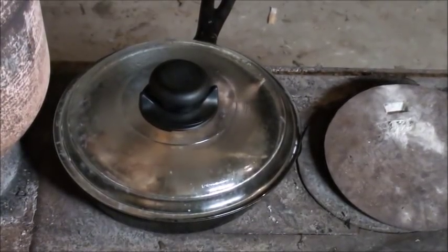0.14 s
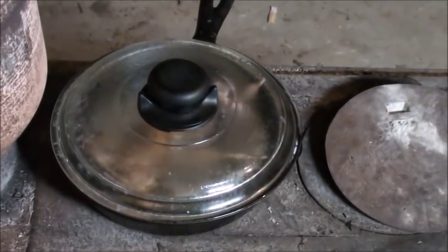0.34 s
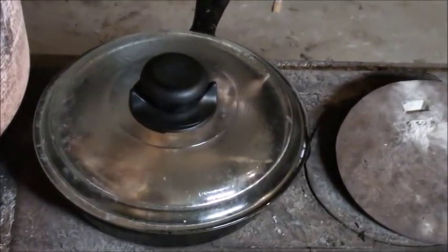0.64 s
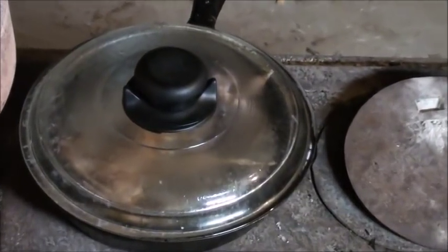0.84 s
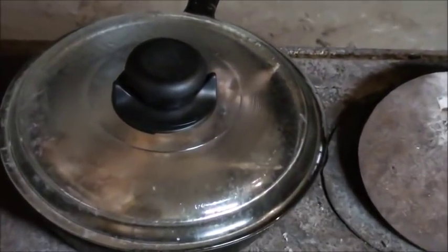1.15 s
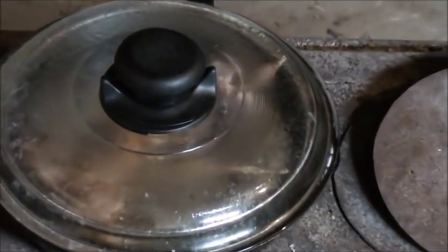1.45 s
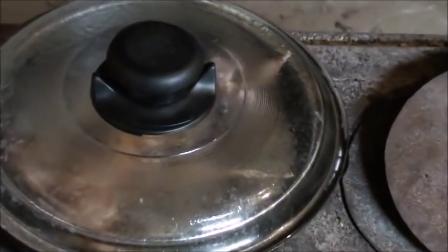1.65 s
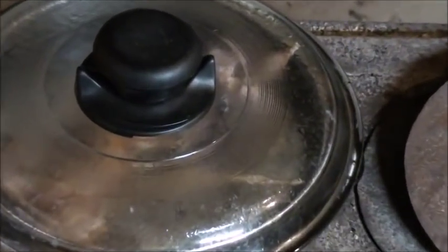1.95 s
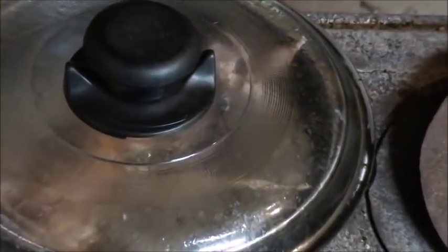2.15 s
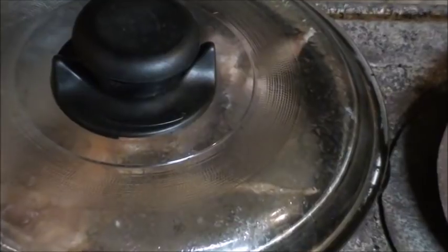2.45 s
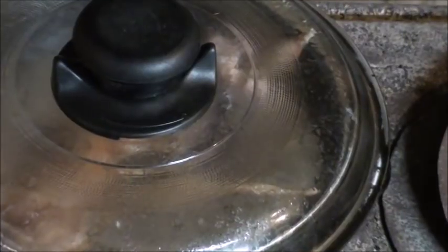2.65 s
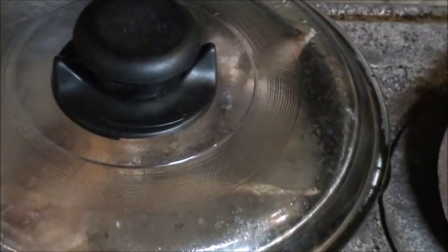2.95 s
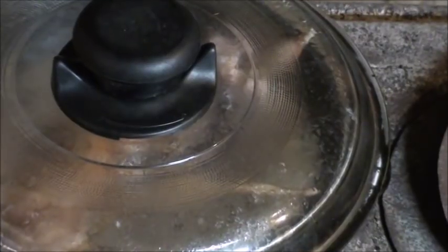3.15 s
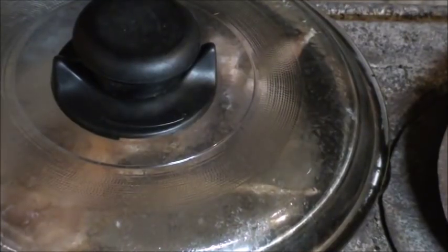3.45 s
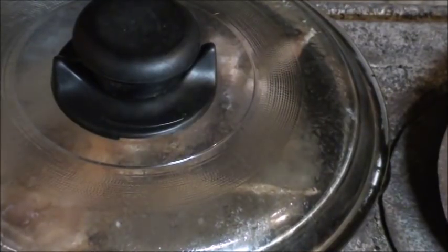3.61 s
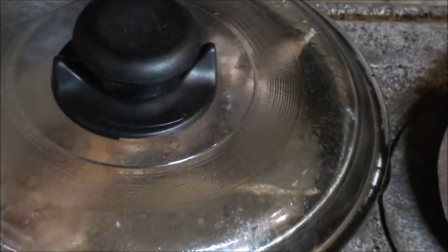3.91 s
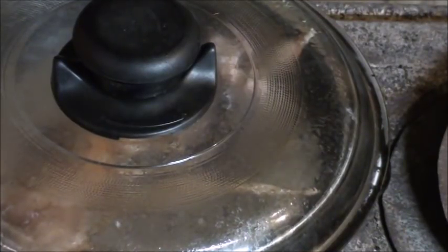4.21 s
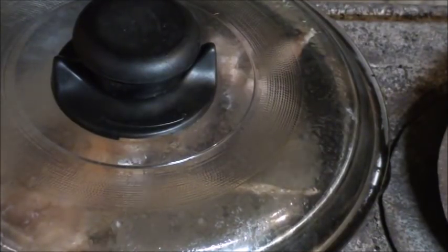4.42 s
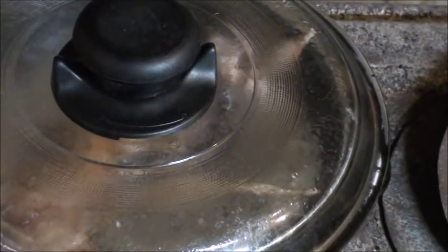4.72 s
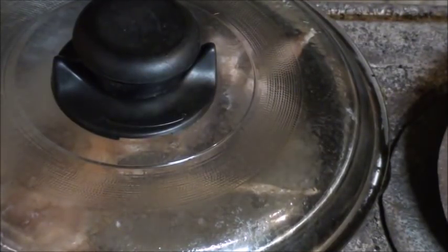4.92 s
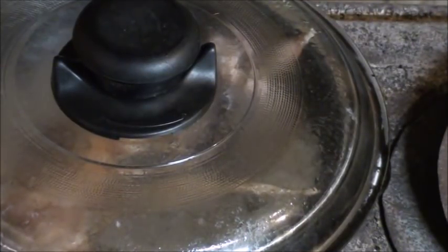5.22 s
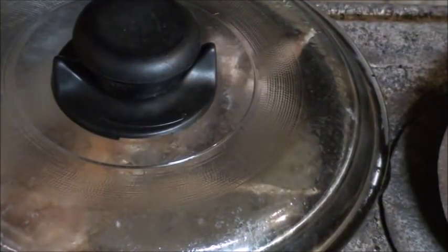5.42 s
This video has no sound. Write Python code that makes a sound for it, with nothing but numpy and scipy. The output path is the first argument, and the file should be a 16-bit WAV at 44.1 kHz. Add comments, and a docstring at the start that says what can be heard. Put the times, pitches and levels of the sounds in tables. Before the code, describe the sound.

Meat sizzles hard in hot grease under a lid, close up, with sharp spits, a hollow bubbling ring and a few low plops.

```python
"""Meat fries in hot grease under a skillet lid, close by, over a soft kitchen rumble and hum (filtered noise).
It opens on a surge of low simmer (bursts ringing the pan), early plops (gliding sines) and a flare of fine fizz.
The sizzle (thousands of tiny damped sines a second, impulses and noise) sags while sharp noise spits cluster.
Near three seconds it fries hard again and the air under the lid, rung by random bursts, boils up loudest.
Low plops follow at four seconds, then the frying eases, with one more flare and a last spit near the end."""
import sys
import numpy as np
from scipy import signal
from scipy.fft import rfft, irfft, next_fast_len
from scipy.io import wavfile
from scipy.ndimage import uniform_filter1d, map_coordinates

SR = 44100
rng = np.random.default_rng(int(sys.argv[2]) if len(sys.argv) > 2 else 0)


def unload_audio(sound):
    """Save the sound as a 16-bit wav file, at the path given as the first command line argument."""
    columns = np.transpose(np.atleast_2d(sound))
    # keep every value between -1 and 1, then stretch to whole-number steps
    steps = np.round(np.clip(columns, -1, 1) * 32767)
    wavfile.write(sys.argv[1], SR, steps.astype(np.int16))


N = 245637  # length in samples

# kitchen rumble, relative spectrum: freq_hz, density_db_per_hz
ROOM_SPECTRUM = [(15, -24), (35, -10), (80, -8), (120, -1.5), (180, -2), (400, 0), (650, -11.5),
                 (1200, -3.5), (3000, -30.5)]
# kitchen hum: freq_hz, width_hz, relative_level_db
HUM_MODES = [(60, 5.4, -18), (96.8, 14, -8.5)]
# low resonances of the covered pan: freq_hz, width_hz, relative_level_db
PAN_MODES = [(201.5, 37, -9), (301.6, 26.5, 1), (379, 47, -7), (408.9, 6, 2), (476.5, 25, -7),
             (700, 88, -15), (889, 42, -13)]
# single fat bubbles: start_s, starting_pitch_hz, level_db, t60_s
FAT_BUBBLES = [(.02, 300, -28, 0.2), (0.186, 300, -20.5, 0.12), (.25, 890, -33, 0.14),
               (.565, 904, -33.5, 0.13), (1.094, 289.4, -30.5, 0.25), (2.368, 2400, -20.5, 0.082),
               (2.577, 970, -23.5, 0.049), (2.58, 1110, -26.5, 0.045), (4.023, 250, -22, 0.043),
               (4.023, 450, -25, .035), (4.024, 620, -31.5, 0.041)]
# modes of the lid's shell: freq_hz, width_hz, relative_level_db
SHELL_MODES = [(2963, 95, -6.5), (3117, 56, -1.5), (3225, 25, 4.5), (3348, 19, 1.5), (3419, 23, 2.5),
               (4020, 130, -10), (4480, 53, -2.5), (4917, 67, 2), (5290, 49, 0.5), (7300, 40, 3)]
# how hard the juices boil, heard as the ring under the lid, before trim: time_s, level_db
BOIL_CURVE = [(0, -34.5), (.7, -37.5), (1.25, -40), (2, -36.5), (2.35, -34), (3.3, -33), (4.1, -37),
              (5.57, -39)]
# main resonance of the air under the lid: freq_hz, width_hz, relative_level_db
CAVITY_MODE = [(1368.3, 21.3, 0)]
# higher resonances of the air under the lid: freq_hz, width_hz, relative_level_db
LID_AIR_MODES = [(1436, 32, -3.5), (1558, 54, -1), (2268, 8.1, -4), (2316, 22, -8), (2415, 28, -4.5)]
# gushes of steam that swell the main resonance, before trim: start_s, length_s, level_db
STEAM_GUSHES = [(0.083, 0.079, -30.5), (0.279, 0.046, -31), (0.44, 0.054, -33), (0.545, 0.057, -33.5),
                (0.681, 0.031, -32), (0.792, 0.032, -33.5), (0.997, 0.027, -32), (1.521, 0.026, -33.5),
                (1.578, 0.02, -32.5), (1.666, 0.044, -34), (2.322, 0.089, -31), (2.648, 0.038, -33.5),
                (2.82, 0.045, -30.5), (2.902, 0.045, -30.5), (3.023, 0.12, -35), (3.153, 0.035, -31.5),
                (3.425, 0.022, -32), (3.586, 0.054, -34), (3.749, 0.029, -33.5), (3.815, 0.048, -32),
                (3.937, 0.11, -35), (4.311, 0.024, -31), (4.99, 0.035, -34), (5.408, 0.069, -34)]
# bright resonance at the rim: freq_hz, width_hz, relative_level_db
RIM_MODE = [(4204, 90, 0)]
# how hard the grease fries, before flares and trim: time_s, level_db
FRY_CURVE = [(0, -17), (.38, -18.5), (.6, -20), (.85, -19), (1.25, -20.5), (1.95, -18), (2.4, -19.5),
             (2.95, -17), (3.8, -18.5), (4.6, -20), (5.1, -21.6), (5.57, -21)]
# bursts as they leave by the rim of the lid, relative spectrum: freq_hz, density_db_per_hz
SIZZLE_SPECTRUM = [(500, -29.5), (2000, -22), (2700, -17), (3650, -11), (4050, -4), (4600, -7),
                   (5500, -5.5), (6100, -2), (7200, -0.5), (8400, -8), (9400, -4), (10800, -11),
                   (12200, -19), (15500, -33)]
# sharpest spits of grease: start_s, level_db (above the sizzle source at rms 1)
SPIT_HITS = [(.483, 16), (0.892, 11), (0.95, 7), (.972, 5), (1.122, 1), (1.295, 10), (1.334, 10),
             (1.465, 12), (1.72, 5), (2.353, 7), (4.703, 7), (5.464, 10)]
# juice runs into the grease and the finest fizz flares up: peak_s, length_s, fine_fizz_boost_db
JUICE_FLARES = [(.17, 0.64, 3.8), (1.565, 0.34, 4.4), (2.766, 0.49, 3), (5.202, 0.38, 2.2)]
# gain of the stereo side part: freq_hz, gain_db
SIDE_GAIN = [(60, -45), (170, -15), (330, -16), (650, -4), (1000, -4.5), (1400, -17.5), (3000, -13.5),
             (4200, -36), (5500, -16), (9000, -15), (11000, -100)]

GUSH_ATTACK_S, GUSH_RELEASE_S = 0.0088, .025  # time constants before and after each gush
FINE_DB, DRYING_DB_PER_S = 0, 0.41  # finest fizz at the start, and how it thins as the meat dries
FLARE_SHARE = 0.26  # part of a flare's boost, in dB, that the whole sizzle gains too
LEAN_DB = .7  # first channel over the second
TOP_HZ = 15750  # nothing sounds from here up


def amp(db):
    """Decibels to gain."""
    return 10 ** (np.asarray(db) / 20)


def unit(x):
    """Scale to rms 1."""
    return x / np.sqrt(np.mean(x ** 2) + 1e-20)


def evened(x, size):
    """Hold x near rms 1 over every 2 * size samples."""
    power = uniform_filter1d(uniform_filter1d(x * x, size), size)
    return x / np.sqrt(np.abs(power) + 1e-20)


def along(points, hz):
    """Read (freq_hz, value) points on a log frequency axis."""
    freq_hz, value = np.transpose(points)
    return np.interp(np.log(hz + 1), np.log(freq_hz + 1), value)


def seconds():
    """Time of every sample in seconds."""
    return np.arange(N) / SR


def level_curve(rows):
    """Draw (time_s, level_db) points as one level per sample."""
    time_s, level_db = np.transpose(rows)
    return np.interp(seconds(), time_s, level_db)


def wobble(rate):
    """A smooth random curve with rate knots a second."""
    knots = rng.standard_normal(int(N * rate / SR) + 4)
    return map_coordinates(knots, [np.arange(N) * rate / SR])


def hump(centre, length):
    """A smooth rise from 0 to 1 and back."""
    return np.cos(np.pi * np.clip((seconds() - centre) / length, -.5, .5)) ** 2


def filtered(x, response):
    """Multiply the spectrum of x by a response of frequency."""
    padded = next_fast_len(N + SR // 2)
    spectrum = rfft(x, padded) * response(np.fft.rfftfreq(padded, 1 / SR))
    return irfft(spectrum, padded)[..., :N]


def above(x, edge_hz, order):
    """High-pass without phase shift."""
    return filtered(x, lambda hz: 1 / (1 + (edge_hz / (hz + 1)) ** order))


def coloured(x, spectrum, size=2048):
    """Give x the spectrum through a causal minimum-phase filter, so that clicks keep their sharp front."""
    cepstrum = irfft(np.log(amp(along(spectrum, np.fft.rfftfreq(size, 1 / SR)))))
    # folding the cepstrum forward makes the filter minimum-phase
    cepstrum[1:size // 2] *= 2
    cepstrum[size // 2 + 1:] = 0
    impulse = irfft(np.exp(rfft(cepstrum)))
    return signal.fftconvolve(x, impulse)[:N]


def resonate(x, modes):
    """Ring x through (freq_hz, width_hz, level_db) resonances of alternating sign."""
    def response(hz):
        total = 0
        for k, (centre, width, db) in enumerate(modes):
            damping = 1j * hz * width
            total = total + (-1) ** k * amp(db) * damping / (centre * centre - hz * hz + damping)
        return total
    return filtered(x, response)


def random_sizes_db(spread_db, shape):
    """Bell-shaped spread of sizes in dB, cut at 2.5 deviations."""
    return spread_db * np.clip(rng.standard_normal(shape), -2.5, 2.5)


def bursts(rate, spread_db):
    """Impulses at random moments, rate a second, of log-normal size and either sign."""
    when, sign = rng.random((int(rate * N / SR), 2)).T
    sizes = amp(random_sizes_db(spread_db, len(when))) * np.sign(sign - .5)
    return unit(np.bincount((when * N).astype(int), sizes, N))


def bubbles(rate, spread_db, cycles, low_hz, high_hz, size=160):
    """Tiny bubbles, each a damped sine of its own pitch whose decay constant is a number of cycles."""
    when, pitch = rng.random((int(rate * N / SR), 2)).T[:, :, None]
    size_db = random_sizes_db(spread_db, when.shape)
    hz = low_hz + (high_hz - low_hz) * pitch
    turns = hz * np.arange(size) / SR
    grains = amp(size_db) * np.sqrt(hz) * np.sin(2 * np.pi * turns) * np.exp(-turns / cycles)
    at = (when * N).astype(int) + np.arange(size)
    return unit(np.bincount(at.ravel(), grains.ravel())[:N])


def boil():
    """Decibels by which the boiling lies above its average."""
    level_db = level_curve(BOIL_CURVE)
    return level_db - level_db.mean()


def kitchen():
    """Soft room rumble with a wavering low hum, both filtered noise."""
    rumble = unit(coloured(rng.standard_normal(N), ROOM_SPECTRUM, size=8192))
    hum = evened(resonate(rng.standard_normal(N), HUM_MODES), size=8000)
    return amp(-43.5) * rumble + amp(-54.5) * hum


def simmer(level_db=-41.0, follows=0.4, surge_db=8.0, surge_s=0.57, drying_db_per_s=0.27):
    """Juices bubble under the meat and sound the low pan resonances; an opening surge settles to the boil."""
    t = seconds()
    settling = np.maximum(1 - t / surge_s, 0)
    swell_db = follows * boil() + surge_db * settling - drying_db_per_s * t
    strength = amp(level_db + swell_db + 1.1 * wobble(8.8))
    return strength * evened(resonate(bursts(rate=700, spread_db=2.5), PAN_MODES), size=4000)


def plops(rise=.12, attack_s=0.0013, rough=0.46, rough_at_hz=900):
    """Fat bubbles ring briefly, pitch rising and wavering as they surface; small ones waver most."""
    out = np.zeros(N)
    for start_s, hz, db, t60 in FAT_BUBBLES:
        t = np.maximum(seconds() - start_s, 0)
        glide = 2 * np.pi * hz * t * (1 + rise * t / t60)
        waver = rough * hz / rough_at_hz * wobble(400)
        envelope = amp(db - 60 * t / t60) * (1 - np.exp(-t / attack_s))
        out += envelope * np.sin(glide + waver)
    return out


def shell(start_db=-33.5, follows=0.56, wetting_db_per_s=0.74):
    """Droplets pepper the lid's underside and faintly ring its modes, more as it boils and gets wet."""
    level_db = start_db + follows * boil() + wetting_db_per_s * seconds()
    return amp(level_db) * unit(resonate(bursts(rate=600, spread_db=3.5), SHELL_MODES))


def gushes():
    """Strength of the steam gushes: each rises, holds and dies away; the strongest wins."""
    t = seconds()
    strengths = []
    for start_s, length_s, db in STEAM_GUSHES:
        before = np.maximum(start_s - t, 0) / GUSH_ATTACK_S
        after = np.maximum(t - start_s - length_s, 0) / GUSH_RELEASE_S
        strengths.append(amp(db) * np.exp(-(before + after)))
    return np.max(strengths, axis=0)


def lid_drive(spatter):
    """Shared spatter plus a fresh layer of dense small bursts strikes the air under the lid."""
    return amp(-4.0) * spatter + bursts(rate=2500, spread_db=2.5)


def lid(spatter, gush_db=1.5, rest_db=-38, follows=0.23, waver_db=3.0, ring_db=-0.6, dulling=0.28):
    """Bursts keep the air under the lid ringing; it swells with gushes and wavers between them."""
    between = amp(rest_db + follows * boil() + waver_db * wobble(16))
    strength = np.maximum(between, amp(gush_db) * gushes())
    cavity = strength * evened(resonate(lid_drive(spatter), CAVITY_MODE), size=2000)
    ring_level = amp(level_curve(BOIL_CURVE) + ring_db + 1.3 * wobble(9))
    ring = ring_level * unit(resonate(lid_drive(spatter), LID_AIR_MODES))
    # a harder boil makes bigger bubbles, which favour the lower resonances
    ring = ring + above(ring, 1900, order=16) * (amp(-dulling * boil()) - 1)
    # the lid radiates little below its first resonance
    return above(cavity + ring, 1030, order=10)


def flecks(level_db=-33.5, soft_hz=11000):
    """Sparse bursts sound one bright, short-lived resonance at the rim."""
    ticks = above(resonate(bursts(rate=220, spread_db=5.5), RIM_MODE), 4730, order=12)
    return amp(level_db) * unit(ticks - above(ticks, soft_hz, order=8))


def sharp_spits(t60=0.0086):
    """Drops of water burst out of the grease in short, decaying cracks of noise."""
    out, t = np.zeros(N), np.arange(SR // 50) / SR
    for start_s, db in SPIT_HITS:
        crack = amp(db - 60 * t / t60) * np.sign(rng.standard_normal(len(t)))
        out[round(start_s * SR):][:len(t)] += crack
    return out


def sizzle(spatter, gain_db=-0.25):
    """Dense fizz, longer-ringing bubbles, spatter and steam come in flurries, cut by sharp spits."""
    flare_db = sum(db * hump(peak_s, length_s) for peak_s, length_s, db in JUICE_FLARES)
    fine_db = FINE_DB - DRYING_DB_PER_S * seconds() + flare_db
    fizz = bubbles(rate=5000, spread_db=2.5, cycles=4, low_hz=2024, high_hz=15100)
    tinkle = bubbles(rate=350, spread_db=3.0, cycles=89, low_hz=3000, high_hz=12004, size=1100)
    steam = rng.standard_normal(N)
    flurries = amp(0.37 * wobble(18) + 0.35 * wobble(70))
    bed = fizz + amp(-6.0) * tinkle + amp(-6) * spatter + amp(2.5) * steam
    source = unit(flurries * bed) + sharp_spits()
    sound = unit(coloured(source, SIZZLE_SPECTRUM))
    # only the finest fizz, at the top of the spectrum, follows fine_db
    sound = sound + above(sound, 8400, order=16) * (amp(fine_db) - 1)
    return amp(level_curve(FRY_CURVE) + FLARE_SHARE * flare_db + gain_db) * sound


def frying():
    """One patch of the pan: its sizzle, the ringing under and in the lid, and its simmering juices."""
    spatter = bursts(rate=450, spread_db=4.5)
    return sizzle(spatter) + flecks() + shell() + lid(spatter) + simmer()


def scene():
    """Bubbles burst all over the pan, so the two channels differ by a weaker, unrelated part."""
    mid = frying() + plops() + kitchen()
    side = filtered(frying() + kitchen(), lambda hz: amp(along(SIDE_GAIN, hz)))
    return np.array([mid + side, mid - side]) * amp([[LEAN_DB / 2], [-LEAN_DB / 2]])


def record(dry):
    """The deepest bass is shed and the treble stops dead at the band limit."""
    return filtered(above(dry, 8.9, order=2), lambda hz: hz < TOP_HZ)


dry = scene()
out = record(dry)
unload_audio(out)
```